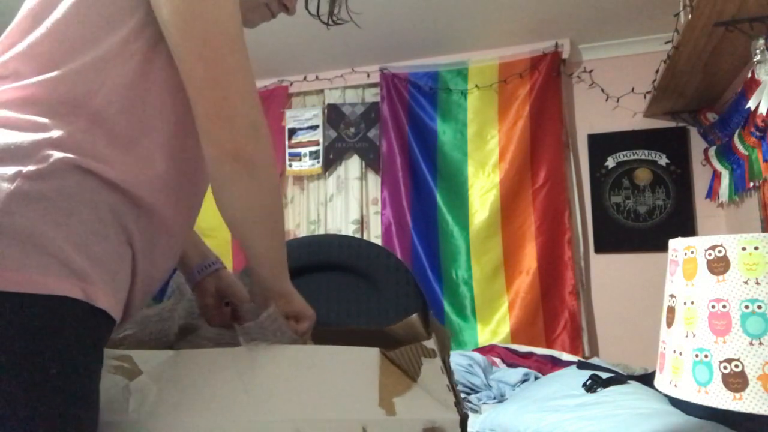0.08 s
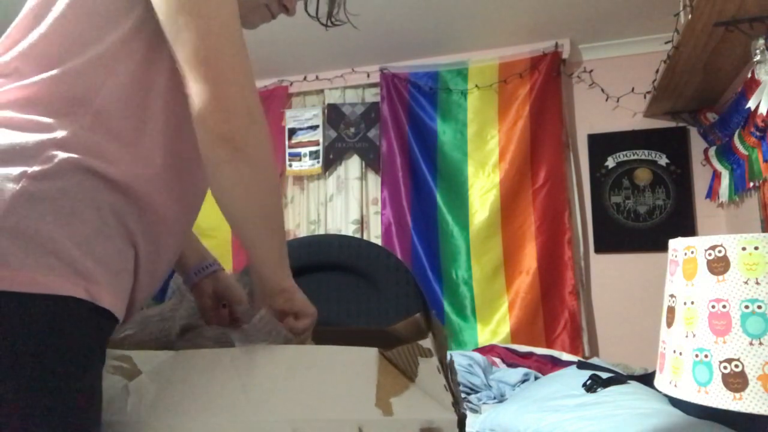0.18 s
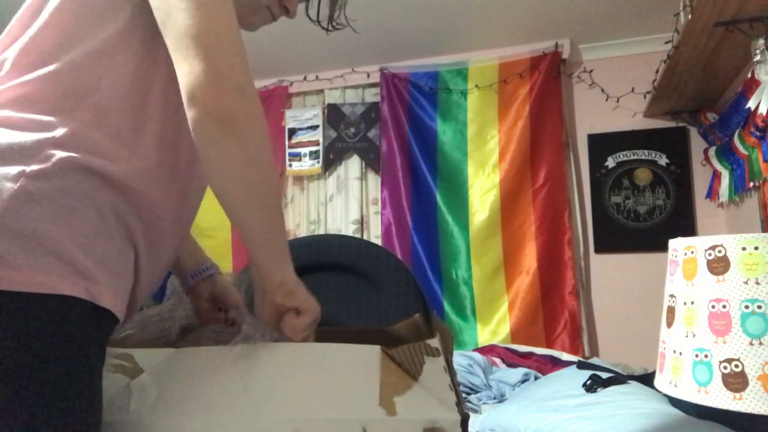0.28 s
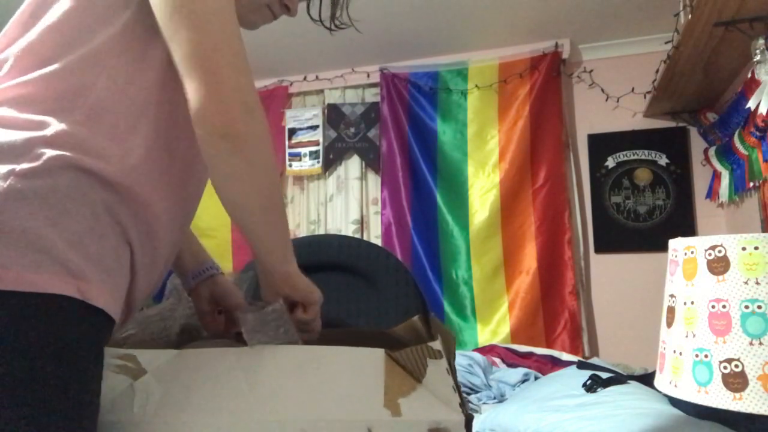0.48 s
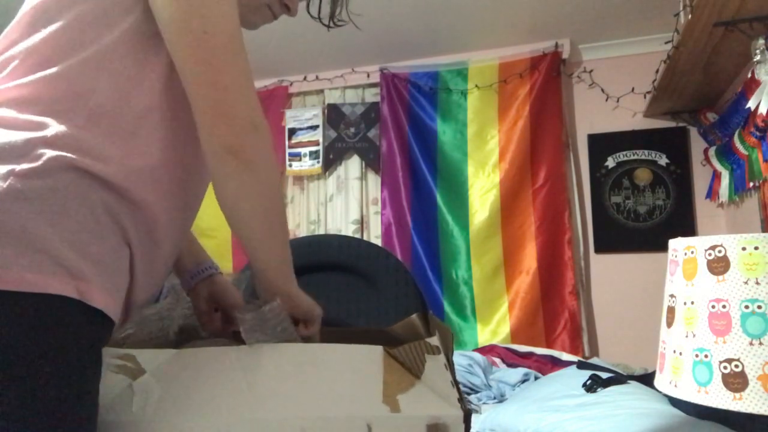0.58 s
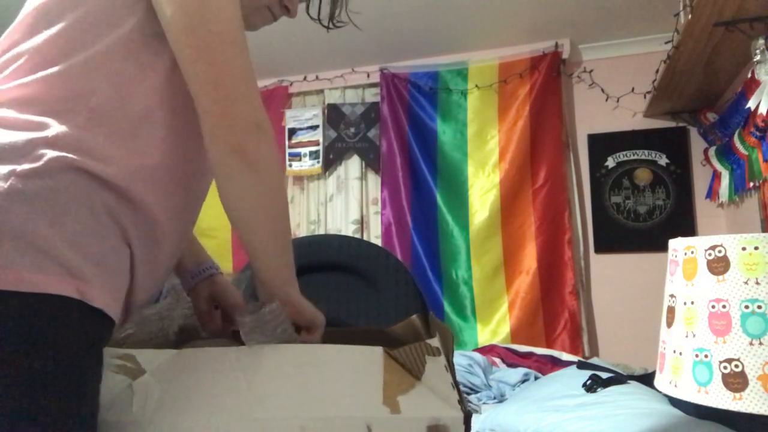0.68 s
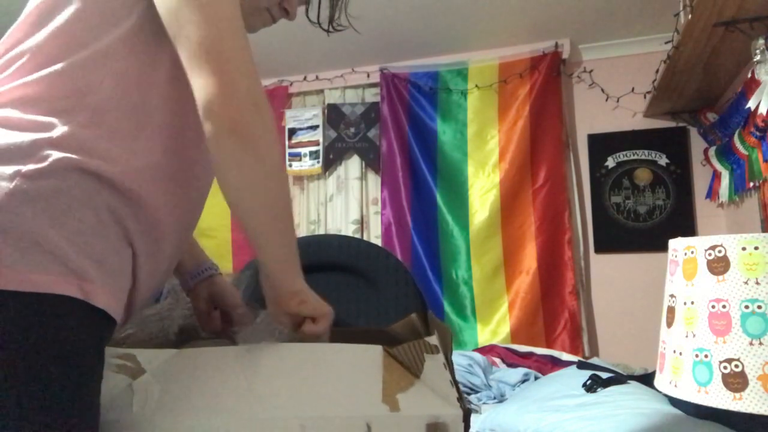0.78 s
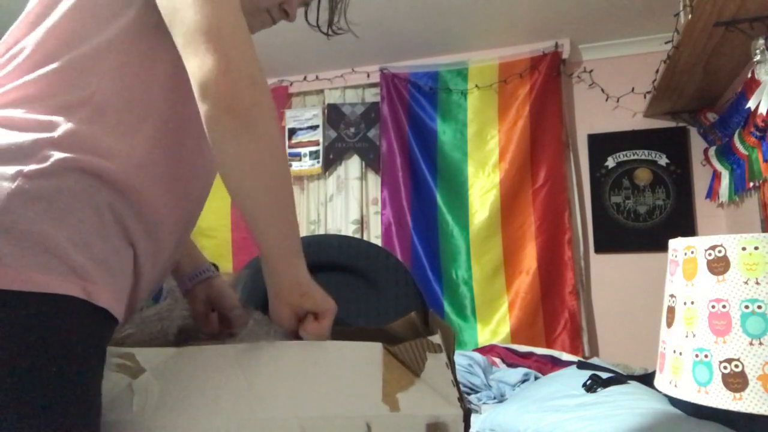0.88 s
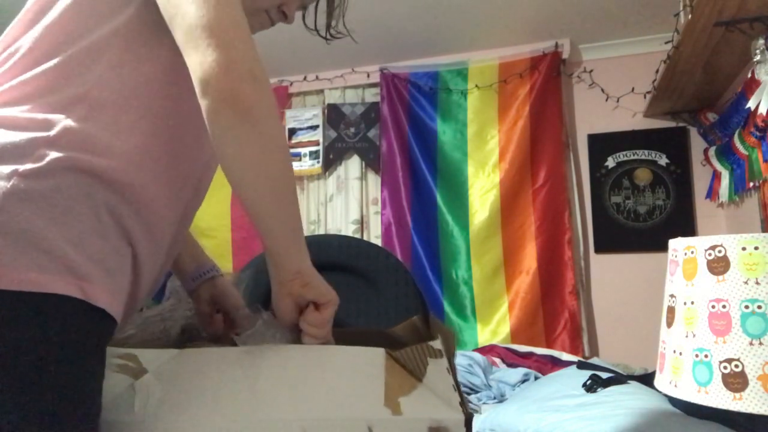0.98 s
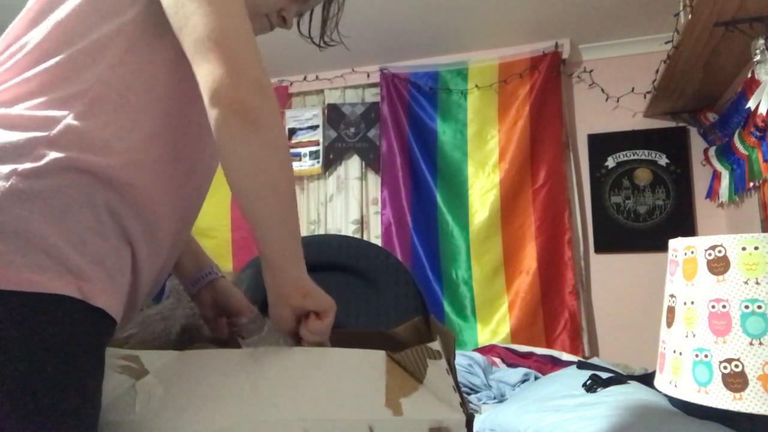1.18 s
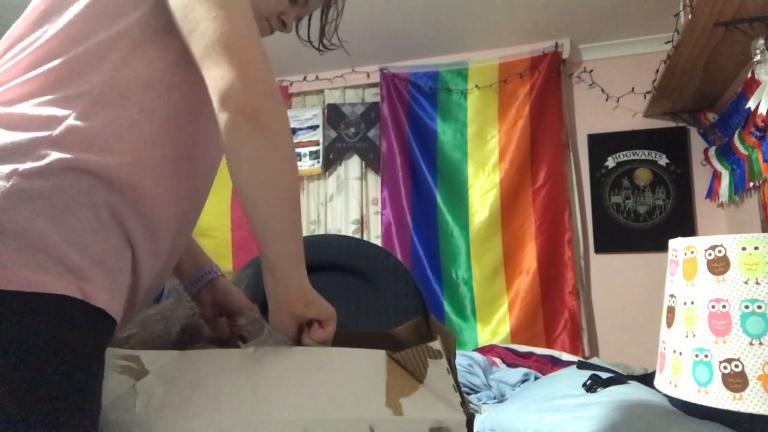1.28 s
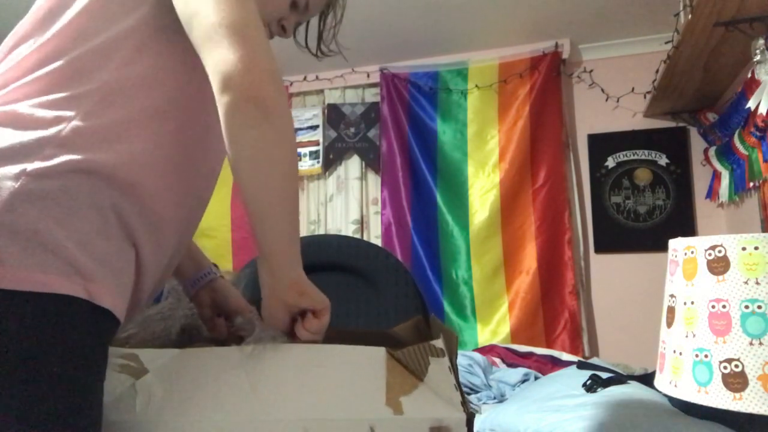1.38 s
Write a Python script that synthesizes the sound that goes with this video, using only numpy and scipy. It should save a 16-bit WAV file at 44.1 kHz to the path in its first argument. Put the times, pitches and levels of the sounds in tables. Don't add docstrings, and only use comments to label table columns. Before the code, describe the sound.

Crinkling paper is yanked in a cardboard box, one hard crunch followed by a weaker one

```python
import sys
import numpy as np
from scipy import signal
from scipy.fft import rfft, irfft
from scipy.io import wavfile
from scipy.ndimage import uniform_filter1d, map_coordinates

SR = 44100
rng = np.random.default_rng(int(sys.argv[2]) if len(sys.argv) > 2 else 0)


def wav_record(signal):
    frames = np.transpose(np.atleast_2d(signal))
    bounded = np.clip(frames, -1, 1)
    quanta = np.round(bounded * 32767).astype(np.int16)
    wavfile.write(sys.argv[1], SR, quanta)


def amplitude_ratio(level_db):
    exponent = np.asarray(level_db, float) / 20
    return 10 ** exponent


N = 61740


def unit(x):
    return x / np.sqrt(np.mean(x ** 2) + 1e-20)


def along(points, hz):
    f, value = np.transpose(points)
    return np.interp(np.log(hz + 1), np.log(f + 1), value)


def wobble(rate):
    knots = rng.standard_normal(int(N * rate / SR) + 4)
    return map_coordinates(knots, [np.arange(N) * rate / SR])


def noise(spectrum, patchy_db):
    hz, _, z = signal.stft(rng.standard_normal(N + SR // 10), SR, nperseg=256)
    patches = uniform_filter1d(rng.standard_normal(z.shape), 8, 0)
    patches = uniform_filter1d(patches, 3, 1)
    x = signal.istft(z * amplitude_ratio(patchy_db * unit(patches)), nperseg=256)[1]
    colour = amplitude_ratio(along(spectrum, np.fft.rfftfreq(len(x), 1 / SR)))
    return unit(irfft(rfft(x) * colour, len(x))[:N])


def add(out, s, x):
    part = out[round(s * SR):][:len(x)]
    faded = x * np.minimum(1, np.linspace(5, 0, len(x)))
    part += faded[:len(part)]


# (f/Hz, level/dB per Hz)
AIR_COLOUR = [(18, -50), (48, 2.5), (153, -1.5), (204, -19.5), (404, -10.5), (3000, -31.5), (7000, -34),
              (16000, -31)]


def air():
    return amplitude_ratio(-63.5) * noise(AIR_COLOUR, patchy_db=3.0)


# (f/Hz, time to fall 60 dB t/s)
ROOM_RING = [(200, 0.34), (2000, 0.21), (10000, 0.11)]


def room(x):
    out, step = np.zeros(N), SR // 10
    for a in range(0, N, step):
        hz, t, z = signal.stft(rng.standard_normal(SR // 3), SR, nperseg=256)
        fade = amplitude_ratio(-60 * t / along(ROOM_RING, hz)[:, None])
        tail = signal.istft(z * fade, SR, nperseg=256)[1]
        tail /= np.linalg.norm(tail)
        add(out, a / SR + 0.004, signal.fftconvolve(x[a:a + step], tail))
    return amplitude_ratio(-16) * out


# (t/s, level/dB, load on the box relative to it level/dB)
HANDLING_MOVES = [(0, -50.5, -6.5), (0.203, -50, -4.5), (.212, -38.5, -0.5), (0.309, -37.5, -0.5),
                  (0.331, -48, 2), (.47, -54, -4), (0.571, -65.5, -0.5), (0.712, -67, -2.5),
                  (0.743, -46.5, -1), (0.817, -49.5, 3), (0.851, -39, -11.5), (0.884, -57, -4),
                  (1.001, -53.5, -2), (1.082, -61.5, -2), (1.127, -59.5, -2.5), (1.141, -54, -7),
                  (1.325, -58.5, -3.5), (1.4, -53, -6.5)]


def handling():
    s, paper_db, box_db = np.transpose(HANDLING_MOVES)
    t = np.arange(N) / SR
    return np.interp(t, s, paper_db), np.interp(t, s, paper_db + box_db)


# (f/Hz, level/dB per Hz)
BOX_COLOUR = [(24, -23), (40, -35), (247, -6.5), (671, -7.5), (770, -21.5), (1140, -5), (1500, -22),
              (1950, -49), (3300, -120)]


def box_hum(box_db):
    unsteady_db = 2.55 * wobble(39.5)
    return amplitude_ratio(box_db - 0.5 + unsteady_db) * noise(BOX_COLOUR, patchy_db=-1.0)


# (pitch relative to the lowest f/f, level/dB)
WALL_MODES = [(1, 3), (1.15, -5.5), (2.1, -3), (2.8, -8), (3.7, -16)]
# (t/s, peak level/dB, lowest mode f/Hz, time to fall 60 dB t/s); the two near 0.13 s,
# about 2300 Hz, are bright grains of the crackling paper
WALL_KNOCKS = [(0.209, -30, 424, 0.064), (.212, -32, 1180, 0.077), (.228, -26, 1206, 0.031),
               (0.26, -17, 464, 0.036), (.258, -20, 2524, 0.018), (0.268, -31.5, 296.8, 0.18),
               (.275, -33.5, 243, 0.23), (0.311, -39, 494, 0.098), (0.32, -41.5, 444, 0.079),
               (0.329, -46, 348, 0.036), (.347, -45, 462.4, 0.15), (0.357, -27.5, 538, 0.029),
               (.7425, -34, 843, 0.055), (0.751, -50, 135, 0.15), (0.786, -23.5, 1390, 0.016),
               (.791, -36, 778, 0.054), (0.787, -25.5, 614, 0.043), (0.797, -35.5, 532.4, 0.16),
               (0.797, -31, 127, 0.024), (0.854, -31, 480, 0.045), (.856, -36.5, 150.3, 0.089),
               (0.896, -38.5, 254, 0.073), (.931, -40, 614, 0.038), (.936, -38, 325, 0.054),
               (.938, -37.5, 160, 0.14), (.935, -42, 68, 0.28), (0.873, -40.5, 67.4, 0.15),
               (1.144, -46, 604, 0.069), (1.1315, -48, 3060, .02), (1.147, -40.5, 976, 0.04),
               (1.149, -51.5, 121, 0.2), (1.249, -49, 3200, 0.028), (.5, -59, 65, .2),
               (0.757, -53, 70, .15), (1.328, -54, 44.4, 0.32), (.124, -55, 2360, 0.025),
               (.134, -45, 2270, .03), (0.506, -51, 1008, 0.07), (.52, -56, 444, .08),
               (1.0, -49, 260, 0.11), (1.022, -48.5, 201, 0.097), (1.031, -53.5, 94, .15),
               (1.153, -46.5, 1060, 0.048)]


def knocks():
    out, t = np.zeros(N), np.arange(SR // 4) / SR
    for s, db, hz, t60 in WALL_KNOCKS:
        drift = np.cumsum(rng.standard_normal((len(WALL_MODES), len(t))), 1)
        drift *= 0.081 * np.sqrt(hz / 400 + 0.12)
        ring = np.zeros(len(t))
        for (ratio, level), phase in zip(WALL_MODES, drift):
            fade = amplitude_ratio(level - 60 * t * ratio ** 0.83 / t60)
            ring += fade * np.sin(2 * np.pi * hz * ratio * t + phase)
        add(out, s, amplitude_ratio(db - 2) * ring * (1 - np.exp(-t * hz / 0.69)))
    return out


# (f/Hz, level/dB per Hz)
PAPER_COLOUR = [(350, -13), (600, -5.5), (869, -4), (1210, -11), (1470, -6.5), (3890, -11), (16000, -25)]


def paper_hiss():
    return noise(PAPER_COLOUR, patchy_db=3.0)


def crackle(count=3600):
    middle_hz, spread = 3300, 0.567
    u, g = rng.random((count, 2)), rng.standard_normal(count)
    start = (u[:, 0] * N).astype(int)
    hz = np.clip(middle_hz * np.exp(spread * g), 1100, 11000)[:, None]
    k = np.arange(400)
    cycles = hz * k / SR
    size = amplitude_ratio(-1.5 * np.log(u[:, 1] + 0.08))[:, None] * (hz / middle_hz) ** 0.3
    grains = size * np.sin(2 * np.pi * cycles) * np.exp(-cycles) * (1 - np.exp(-cycles / 1.2))
    mixed = np.bincount((start[:, None] + k).ravel(), grains.ravel(), N + 400)[:N]
    return unit(mixed * amplitude_ratio(2 * wobble(30)))


def rustle():
    paper_db, box_db = handling()
    scrape = amplitude_ratio(-2.5 + 2.5 * wobble(60.43)) * paper_hiss()
    sheets = scrape + amplitude_ratio(-3.5) * crackle()
    return amplitude_ratio(paper_db) * sheets + box_hum(box_db)


def clicks(events):
    out, t = np.zeros(N), np.arange(SR // 50) / SR
    f = np.fft.rfftfreq(len(t), 1 / SR)
    for s, db, hz in events:
        colour = f * hz / (f ** 2 + hz ** 2 + 1) * f / (f + 0.21 * hz)
        colour = colour / (1 + (f / 12000) ** 2)
        grit = unit(irfft(rfft(rng.standard_normal(len(t))) * colour, len(t)))
        fade = amplitude_ratio(db - 3.0 - 60 * t / 0.0098)
        add(out, s, fade * grit * (1 - np.exp(-t / 0.00017)))
    return out


# (t/s, peak level/dB, lowest f/Hz); the one at 0.2066 s is the edge click
# that leads into the big snap at 0.208 s
FOLD_TICKS = [(0.012, -50, 3000), (0.053, -36.5, 2500), (.115, -57, 3560), (0.124, -55, 2270),
              (0.134, -50, 2200), (0.143, -51, 2200), (0.151, -55, 5000), (.170, -59, 2000),
              (0.343, -43, 5030), (.365, -46, 4000), (.397, -35.5, 4020), (0.419, -43, 7100),
              (0.446, -42, 3000), (.468, -39, 3000), (.472, -45, 3000), (0.483, -38, 1490),
              (0.531, -42, 1190), (0.6, -56, 4070), (.654, -79, 2500), (0.772, -39, 3150),
              (.824, -48, 4000), (.871, -33, 4000), (1.011, -49, 7950), (1.034, -45, 6000),
              (1.055, -49, 3800), (1.096, -51, 5000), (1.105, -47, 2500), (1.1317, -45, 6000),
              (1.157, -41, 3020), (1.172, -48, 4500), (1.177, -43, 3460), (1.194, -48, 7000),
              (1.258, -46, 6000), (1.216, -44, 2480), (1.241, -41, 2050), (0.2066, -38, 5000),
              (1.354, -49, 2500)]


def ticks():
    return clicks(FOLD_TICKS)


# (t/s, peak level/dB, f/Hz, time for the tail to fall 60 dB t/s)
CREASE_SNAPS = [(.031, -37, 2196, 0.0083), (0.037, -46, 5100, 0.037), (.044, -32.5, 3975, 0.022),
                (0.089, -34, 4300, 0.019), (.154, -43, 6060, 0.032), (0.198, -40, 2400, 0.11),
                (0.2081, -16, 1690, 0.051), (0.231, -32, 1110, 0.052), (0.2556, -11.5, 1380, 0.057),
                (.2585, -15, 2620, 0.05), (0.2618, -21.5, 910, 0.071), (0.2719, -21, 2800, 0.086),
                (.306, -23.5, 2530, 0.017), (.313, -22.5, 835, 0.047), (.347, -34, 3380, 0.016),
                (.351, -31, 1190, 0.058), (0.39, -35, 7100, 0.029), (0.4, -33.5, 3300, 0.077),
                (0.408, -38, 6170, 0.02), (0.481, -35, 5040, 0.014), (.508, -43, 4530, 0.05),
                (.529, -37.5, 6300, 0.019), (.532, -39, 2000, 0.04), (.625, -55, 4030, 0.023),
                (.682, -49, 2150, 0.3), (0.725, -44, 1300, 0.076), (.733, -40, 860, 0.074),
                (0.7421, -28, 1200, 0.037), (.750, -36.5, 910, 0.15), (.7525, -34.5, 3300, 0.046),
                (0.766, -32.5, 2000, .04), (.775, -43, 695, .06), (.783, -31.5, 4000, 0.032),
                (0.7866, -25, 1400, 0.055), (.848, -34, 3330, 0.024), (.849, -34.5, 855, 0.062),
                (.855, -26.5, 1780, 0.11), (.862, -30, 2440, 0.057), (.885, -38, 2090, 0.052),
                (.905, -38.5, 9150, 0.024), (.9325, -40, 820, 0.054), (1.0072, -44, 3000, 0.028),
                (1.1317, -39, 3130, 0.02), (1.141, -50, 1490, 0.048), (1.155, -56, 1090, 0.051),
                (1.196, -40, 3400, 0.012), (1.249, -38.5, 3040, 0.022), (1.249, -35.5, 8100, 0.016),
                (1.307, -41, 6000, 0.021), (1.398, -33, 1630, 0.12)]


def snaps():
    out = clicks([(s, db - 23, hz) for s, db, hz, _ in CREASE_SNAPS])
    t = np.arange(SR // 6) / SR
    hiss, f = paper_hiss(), np.fft.rfftfreq(len(t), 1 / SR)
    for s, db, hz, t60 in CREASE_SNAPS:
        swing = np.sin(2 * np.pi * hz * t) * np.exp(-t * hz / 0.82)
        pop = amplitude_ratio(10) * swing * (1 - np.exp(-t * hz / 0.8))
        grit = hiss[rng.integers(N - len(t)):][:len(t)]
        colour = 1 / np.sqrt(1 + (f / (2.37 * hz)) ** 2 + (0.62 * hz / (f + 1)) ** 2)
        grit = unit(irfft(rfft(grit) * colour, len(t))) * (1 - np.exp(-t / 0.00064))
        crack = amplitude_ratio(-9 - 60 * t / 0.0054)
        settling = amplitude_ratio(-11.5 - 60 * t / t60)
        add(out, s, amplitude_ratio(db) * (pop + grit * (crack + settling)))
    return out


def scene():
    near = knocks() + rustle() + ticks() + snaps()
    return (air() + room(near) + near)[None]


def roll_off(x):
    return signal.sosfilt(signal.butter(12, 15750, fs=SR, output="sos"), x)


# (f/Hz, level/dB)
MIC_RESPONSE = [(20, -12), (45, -1.5), (9300, -1.5), (10500, -7), (11800, -3.5), (14000, -4), (15700, -4)]


def record(dry):
    padded = N + 4096
    f = np.fft.rfftfreq(padded, 1 / SR)
    response = amplitude_ratio(along(MIC_RESPONSE, f)) * (f < 15750)
    heard = irfft(rfft(dry, padded) * response, padded)[:, :N]
    return roll_off(heard)


dry = scene()
out = record(dry)
wav_record(out)
```